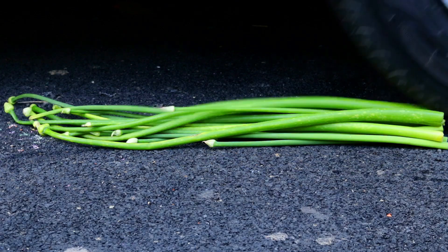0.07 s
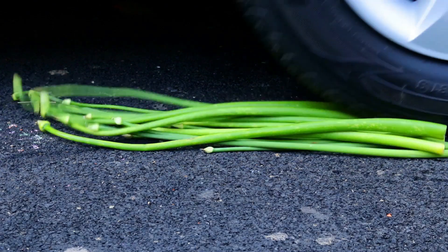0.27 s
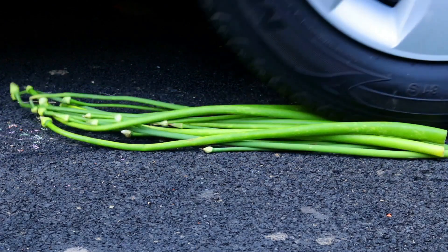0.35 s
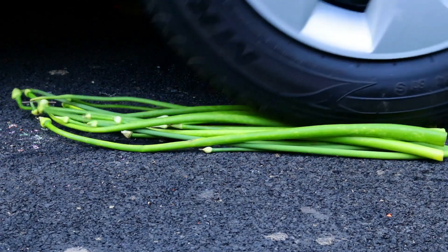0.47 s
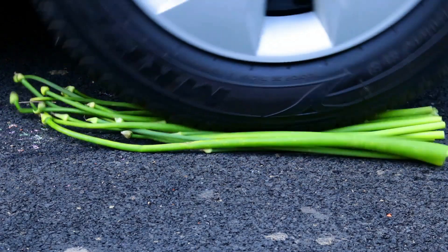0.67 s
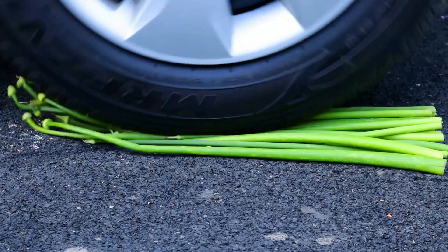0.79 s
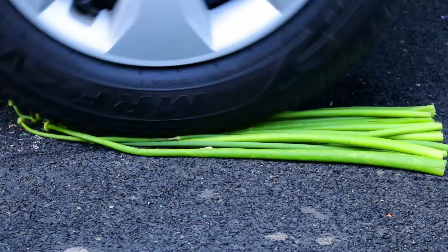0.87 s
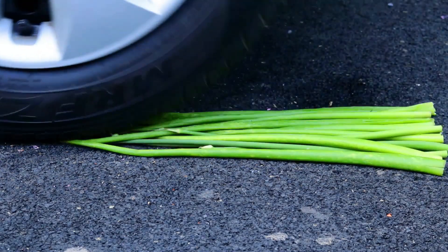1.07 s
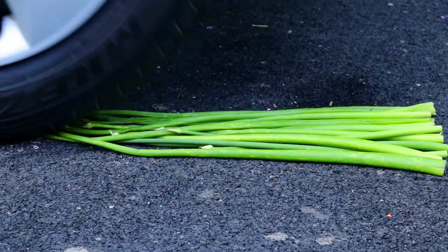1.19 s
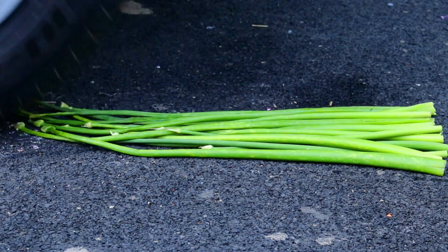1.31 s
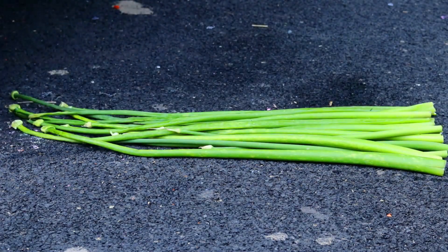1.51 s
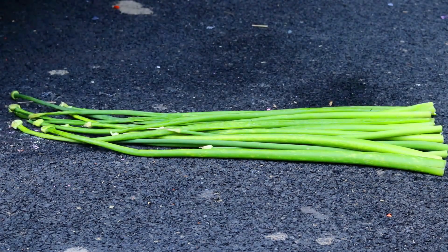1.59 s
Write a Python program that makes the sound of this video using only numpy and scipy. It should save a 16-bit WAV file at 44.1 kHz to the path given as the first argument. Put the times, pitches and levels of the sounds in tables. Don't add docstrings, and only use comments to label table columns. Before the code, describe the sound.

Crisp stalks crunch and burst beneath a slow car wheel, heard very close at road level; thick crackle with sharp snaps thins out into separate wet-sounding pops, over a low, faint street and engine hum.

```python
import sys
import numpy as np
from scipy import signal
from scipy.io import wavfile
from scipy.ndimage import uniform_filter1d

SR = 44100
rng = np.random.default_rng(int(sys.argv[2]) if len(sys.argv) > 2 else 0)


def digitize_waveform(pressure):
    field = np.atleast_2d(pressure).T
    bounded = np.clip(field, -1, 1)
    quanta = np.round(bounded * 32767).astype(np.int16)
    wavfile.write(sys.argv[1], SR, quanta)


def to_linear_factor(level_db):
    exponent = np.asarray(level_db, float) / 20
    return 10 ** exponent


N = 72765

# f/Hz, level/dB (per Hz)
STREET_SPECTRUM = [(25, -17.5), (62, -5), (115, -7), (200, -10.5), (520, -10), (1250, -22.5), (2100, -34.5),
                   (6500, -34.5), (12000, -52.5)]
# f/Hz, correlation/1
LIKENESS = [(60, 1), (500, 0.78), (1400, .85), (2800, 0.64), (5600, 0.32), (11000, 0.2), (15000, -.2)]
# f/Hz, level/dB
LEAN = [(60, -2.5), (500, -1.5), (1400, 0), (2800, -3.5), (15000, -1)]
# f/Hz, level/dB (per Hz)
CRACKLE_SPECTRUM = [(300, -19), (600, -14), (1100, 1), (2800, -1), (3400, -9.5), (4400, -10), (7200, -8),
                    (8500, -13), (15900, -42.5)]
# t/s, level/dB, dryness (treble share)/dB, fullness (low share)/dB
LOAD = [(.16, -52.5, -4, -19), (0.189, -28.5, -4, -18), (.225, -21.5, 0, -17), (0.251, -21.5, 1, -2.5),
        (.40, -20, -3, -3.5), (.48, -22, -3.5, 0), (0.503, -32.5, -0.5, 3), (0.602, -24, -1.5, 0.5),
        (0.721, -24, 1.5, -8.5), (0.786, -34.5, -1, 16), (.81, -51, 2.5, 9.5), (0.839, -40, 0, 4),
        (.90, -37, -5, 4.5), (1.02, -46, 6.5, 13), (1.061, -40, 7, 6.5), (1.17, -42, -1, 5),
        (1.255, -52, 2, 2.5), (1.29, -58, -1, -3.5)]
# t/s, peak level/dB, f/Hz
FIBRE_SNAPS = [(0.1906, -14.1, 2120.0), (0.2193, -11.4, 3230.0), (0.2364, -6.6, 1610.0),
               (0.2442, -6.2, 2360.0), (0.2654, -5.4, 2300.0), (0.2752, -4.5, 1430.0),
               (0.2855, -7.5, 1490.0), (0.3105, -9.4, 1440.0), (0.3299, -1.0, 2710.0),
               (0.3383, -2.2, 2770.0), (0.3536, -8.3, 2810.0), (0.3682, -8.2, 2510.0),
               (0.3739, -10.8, 2840.0), (0.3857, -3.5, 2120.0), (0.4111, -2.6, 1180.0),
               (0.4191, -8.1, 1440.0), (0.4296, -8.6, 2280.0), (0.4385, -8.9, 2090.0),
               (0.444, -3.6, 1130.0), (0.467, -9.8, 840.0), (0.5369, -10.6, 1170.0), (0.5474, -9.9, 2700.0),
               (0.5638, -14.9, 1780.0), (0.5925, -11.9, 1580.0), (0.5953, -10.9, 2650.0),
               (0.6286, -7.2, 1150.0), (0.6344, -4.3, 2750.0), (0.6402, -5.7, 1870.0), (0.665, -4.8, 1270.0),
              (0.6696, -1.6, 1520.0), (0.6735, -6.1, 1220.0), (0.6929, -12.0, 1590.0),
              (0.7087, -10.6, 1130.0), (0.7158, -8.6, 1610.0), (0.7231, -3.4, 1110.0),
              (0.7377, -7.3, 1610.0), (0.7532, -13.0, 1090.0), (0.7557, -6.3, 2710.0),
              (0.8076, -23.8, 1530.0), (0.8949, -17.9, 2660.0), (0.9042, -23.8, 1140.0),
              (0.9162, -27.1, 1850.0), (0.9291, -16.0, 2310.0), (0.9361, -20.2, 1120.0),
              (0.9739, -22.3, 1260.0), (0.9788, -20.3, 1100.0), (1.0271, -26.4, 1080.0),
              (1.075, -7.9, 1380.0), (1.098, -22.0, 2730.0), (1.2522, -35.6, 2660.0)]
# t/s, peak level/dB, f/Hz, ring/cycles, crack level/dB
POPS = [(0.4843, 8.5, 950, 3.5, -23.5), (0.4879, 0, 1330, 10.2, -16), (0.7702, 3.5, 1131, 13, -18),
        (0.7864, 5, 1346, 10, -17), (0.8589, -12, 970, 2.1, -20), (.8768, 3, 1000, 3.46, -15.5),
        (1.0349, -12, 1120, 2, -16), (1.052, 3, 1895, 2.4, -16.5), (1.0581, -1, 1336, 7.2, -17.5),
        (1.0725, -2, 1260, 15, -29.5), (1.104, -19, 1190, 6.5, -24.5), (1.1216, 4, 1530, 6.7, -18),
        (1.152, -0.5, 1940, 4.1, -11)]
SNAPS = FIBRE_SNAPS

STREET_DB, EARLY_STREET_DB = -50.5, 6
IDLE_HZ, IDLE_T60_S, IDLE_DB = 60, .3, -8.5
DUCK_DB, DUCK_FROM_DB, RECOVER_DB_PER_S = -0.0963, -28, 37
GRAINS_PER_S, GRAIN_SPREAD_DB, CLUMP_DB, GRAIN_CYCLES = 14000, 3.5, 2.5, 10
CRACKLE_DB, STIR_DB, STIR_S = 1, 4, .009
SNAP_CYCLES, SNAP_DB, SNAP_ECHO_DB, SNAP_T60_S = 7.0, -1.5, -9, .03
SNAP_CRACK_DB, SNAP_THUD_DB = -11.5, -34.5
POP_DB = 0
POP_ECHO_DB, POP_T60_S, POP_THUD_DB = (-12, -14), (.055, .06), (-13.5, -27.5)
ECHOES_PER_S, FIRST_ECHO_S = 1500, .0018
CRACK_T60_S, CRACK_TAIL_DB, CRACK_LOW_HZ, CRACK_HIGH_HZ = .005, -13, 3500, 7240
STALK_LOW_HZ, STALK_HIGH_HZ, STALK_LOW_SHARE, LONGEST_RING_CYCLES = 950, 3400, 0.79, 13
SKIN_HZ, SKIN_DB, SKIN_T60_S, THUD_HZ = 2345, 8.5, .004, 460
CLIP, CUTOFF_HZ = 1.0, 16000


def rms_one(x):
    return x / np.sqrt(np.mean(x ** 2) + 1e-20)


def at_hz(points, hz):
    table = np.array(points)
    return np.interp(np.log(hz), np.log(table[:, 0]), table[:, 1])


def band(x, low_hz, high_hz, order=2):
    sos = signal.butter(order, [low_hz, min(high_hz, .45 * SR)], "band", fs=SR, output="sos")
    return signal.sosfilt(sos, x)


def drift(rate_hz):
    r = np.exp(-2 * np.pi * rate_hz / SR)
    wander = signal.lfilter([1], [1, -2 * r, r * r], rng.standard_normal(N + 8000))
    return rms_one(wander[8000:])


def ring(clicks, hz, t60):
    r, w = to_linear_factor(-60 / (t60 * SR)), 2 * np.pi * hz / SR
    return signal.lfilter([0, np.sin(w)], [1, -2 * r * np.cos(w), r * r], clicks + 1e-18)


def lean_gain(hz):
    return to_linear_factor(at_hz(LEAN, hz) / 2 * np.array([[1], [-1]]))


def spread(mid, side, hz):
    alike = np.clip(at_hz(LIKENESS, hz), -.9, 1)
    pair = np.sqrt(1 + alike) * mid + np.sqrt(1 - alike) * side * [[1], [-1]]
    return pair * lean_gain(hz) / np.sqrt(2)


def street():
    edges = 25 * 2 ** np.arange(0, 9.6, .5)
    white = rng.standard_normal((2, 2, N + 8000))
    hum = 0
    for k, (low, high) in enumerate(zip(edges, edges[1:])):
        mid, side = band(white[k % 2], low, high)[:, 8000:]
        hz = np.sqrt(low * high)
        level = to_linear_factor(at_hz(STREET_SPECTRUM, hz) + 2.0 * drift(2.7))
        hum = hum + level * spread(mid, side, hz) / lean_gain(hz)
    idle = ring(white[0, 0], IDLE_HZ, IDLE_T60_S)[8000:]
    background = rms_one(hum) + to_linear_factor(IDLE_DB) * rms_one(idle)
    nearness_db = np.interp(np.arange(N) / SR, [.3, 1.2], [EARLY_STREET_DB, 0])
    return to_linear_factor(STREET_DB + nearness_db) * rms_one(background)


def ducking(loud):
    t = np.arange(N) / SR
    power = uniform_filter1d(np.mean(loud ** 2, axis=0), size=200)
    level = 10 * np.log10(power + 1e-12)
    held = np.maximum.accumulate(level + RECOVER_DB_PER_S * t) - RECOVER_DB_PER_S * t
    return to_linear_factor(DUCK_DB * np.maximum(held - DUCK_FROM_DB, 0))


def crackle():
    t = np.arange(N) / SR
    sizes = to_linear_factor(GRAIN_SPREAD_DB * np.minimum(rng.exponential(1, N), 4)) * rng.choice([-1, 1], N)
    born = rng.random(N) < GRAINS_PER_S * to_linear_factor(CLUMP_DB * drift(40)) / SR
    pitches = np.geomspace(450, 14500, 24)
    share = np.cumsum(pitches ** .5) / np.sum(pitches ** .5)
    dealt = np.searchsorted(share, rng.random(N))
    place = rng.choice([-1, 1], N)
    load_s, *columns = np.transpose(LOAD)
    level, dry, full = [np.interp(t, load_s, column) for column in columns]
    out = 0
    for k, hz in enumerate(pitches):
        clicks = sizes * born * (dealt == k)
        rung = ring(np.array([clicks, clicks * place]), hz, GRAIN_CYCLES / hz)
        mid, side = rms_one(band(rung, hz / 1.3, hz * 1.376))
        treble_tilt = dry * np.clip(np.log2(hz / 2500), 0, 1.5)
        low_tilt = full * np.clip(np.log2(2000 / hz) * 2, 0, 1)
        gain = to_linear_factor(at_hz(CRACKLE_SPECTRUM, hz) + treble_tilt + low_tilt) * np.sqrt(hz / 2000)
        out = out + gain * spread(mid, side, hz) / 3
    since = t[:, None] - np.array(SNAPS)[:, 0]
    stirred = np.sum(np.exp(-np.abs(since) / STIR_S) * (since > 0), axis=1)
    stir_db = STIR_DB * (np.minimum(stirred, 1) - .5)
    loaded = (t > load_s[0]) * (t < load_s[-1])
    return to_linear_factor(level + CRACKLE_DB + stir_db) * out * loaded


def burst(hz, t60, cycles, echo_db, crack_db, thud_db):
    t = np.arange(4410) / SR
    draw, noise = rng.random((2, len(t))), rng.standard_normal((4, len(t)))
    click = 1.0 * (t == 0)
    stalk = ring(click, hz, min(cycles, LONGEST_RING_CYCLES) / hz)
    skin = ring(click, SKIN_HZ * rng.uniform(0.66, 1.15), SKIN_T60_S)
    pulse = stalk + to_linear_factor(SKIN_DB + crack_db) * skin
    pulse = -band(pulse, min(STALK_LOW_SHARE * hz, STALK_LOW_HZ), STALK_HIGH_HZ)
    pulse = pulse / np.max(np.abs(pulse))
    struck = (draw < ECHOES_PER_S / SR) * (t > FIRST_ECHO_S)
    taps = struck * np.sign(noise[:2]) * to_linear_factor(echo_db - 60 * t / t60)
    mid, side = signal.fftconvolve(taps, pulse[None, :500])[:, :len(t)]
    fade = to_linear_factor(-60 * t / CRACK_T60_S) + to_linear_factor(CRACK_TAIL_DB - 60 * t / t60)
    high = band(noise[2:] * fade, CRACK_LOW_HZ, CRACK_HIGH_HZ)
    crack = to_linear_factor(crack_db) * 2 * spread(high[0], high[1], 4000)
    thud = to_linear_factor(thud_db) * band(ring(click, THUD_HZ, 2.5 / THUD_HZ), 160, 2000, order=1)
    delay_difference = np.roll(pulse, 2, axis=0) - pulse
    return spread(pulse + mid, 0.51 * side + 2 * delay_difference, hz) + crack + thud


def add_at(out, s, db, sound):
    start = int(s * SR)
    out[:, start:start + sound.shape[1]] += to_linear_factor(db) * sound


def snaps():
    out = np.zeros((2, N + SR))
    for s, db, hz in SNAPS:
        sound = burst(hz, SNAP_T60_S, SNAP_CYCLES, SNAP_ECHO_DB, SNAP_CRACK_DB, SNAP_THUD_DB)
        add_at(out, s, db + SNAP_DB, sound)
    return out[:, :N]


def pops():
    out = np.zeros((2, N + SR))
    for s, db, hz, cycles, crack_db in POPS:
        leaving = int(s > 1)
        sound = burst(hz, POP_T60_S[leaving], cycles, POP_ECHO_DB[leaving], crack_db, POP_THUD_DB[leaving])
        add_at(out, s, db + POP_DB, sound)
    return out[:, :N]


def scene():
    crush = crackle() + snaps() + pops()
    return ducking(crush) * street() + crush


def top_cut(x):
    return signal.sosfilt(signal.butter(12, 16030, fs=SR, output="sos"), x)


def record(dry):
    low_pass = signal.cheby2(10, 50, CUTOFF_HZ, fs=SR, output="sos")
    clipped = np.clip(signal.sosfilt(low_pass, dry), -CLIP, CLIP)
    high_pass = signal.butter(1, 30, "high", fs=SR, output="sos")
    return top_cut(signal.sosfilt(high_pass, clipped))


dry = scene()
out = record(dry)
digitize_waveform(out)
```